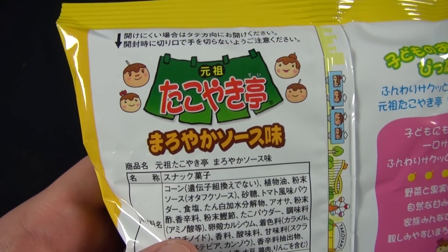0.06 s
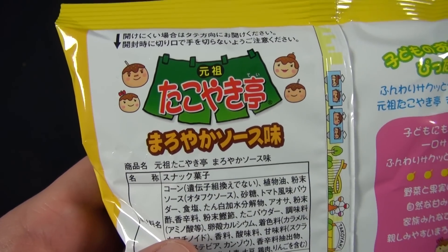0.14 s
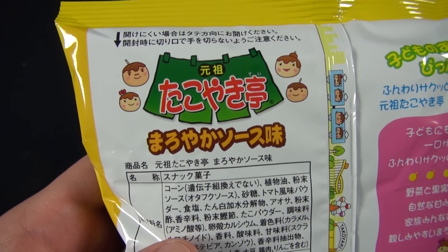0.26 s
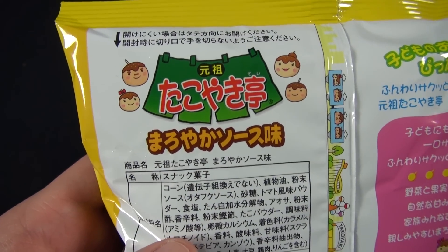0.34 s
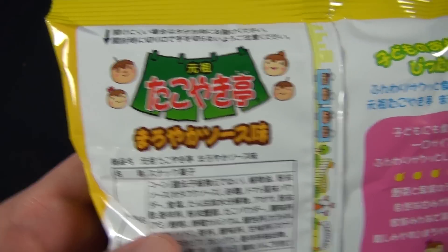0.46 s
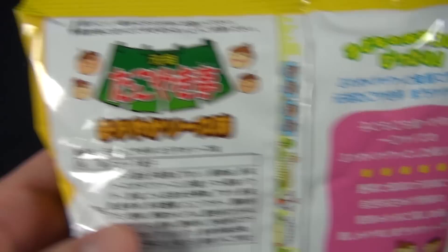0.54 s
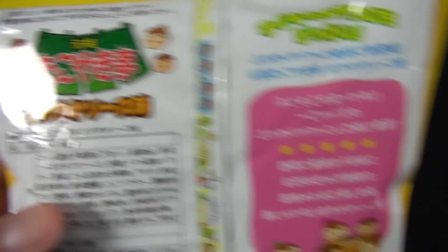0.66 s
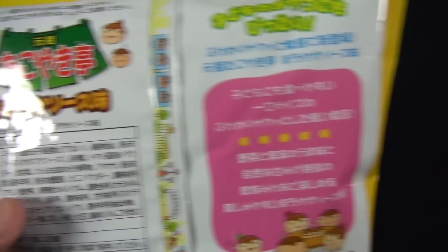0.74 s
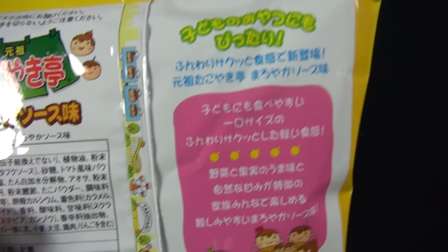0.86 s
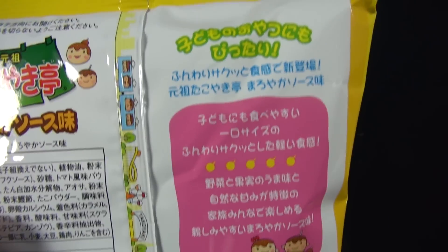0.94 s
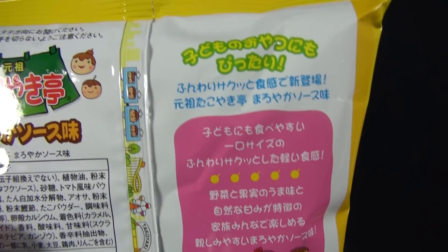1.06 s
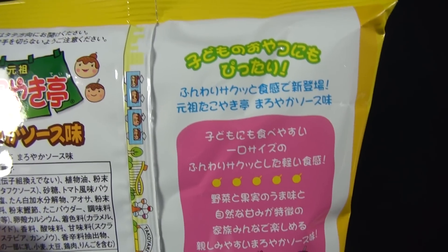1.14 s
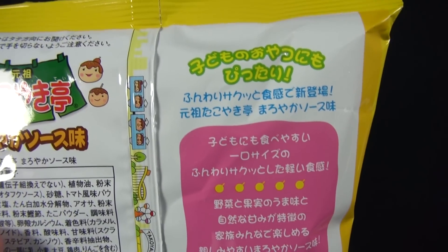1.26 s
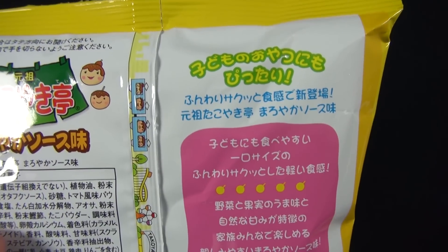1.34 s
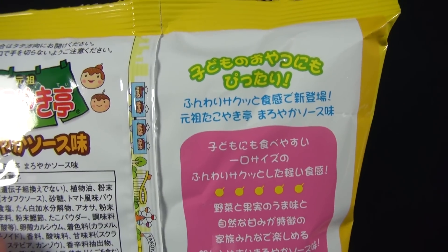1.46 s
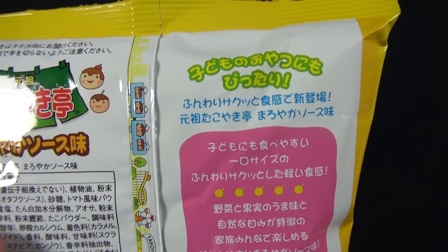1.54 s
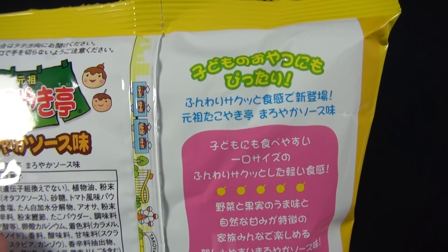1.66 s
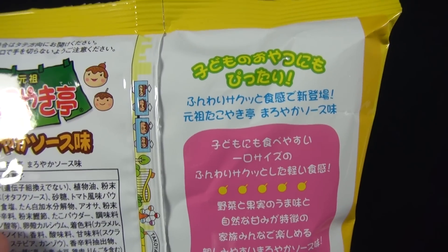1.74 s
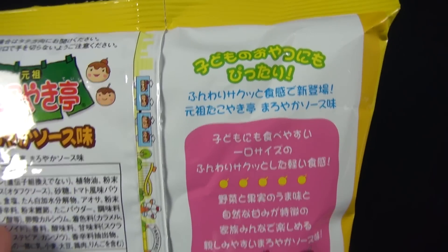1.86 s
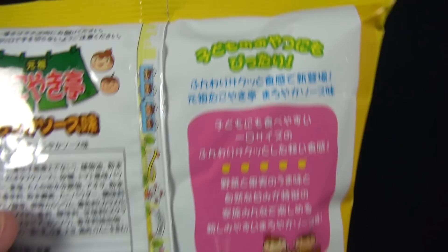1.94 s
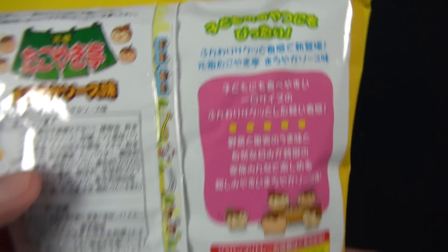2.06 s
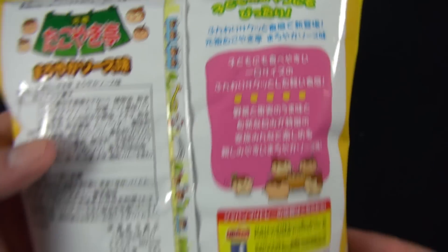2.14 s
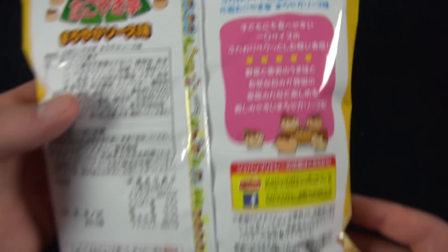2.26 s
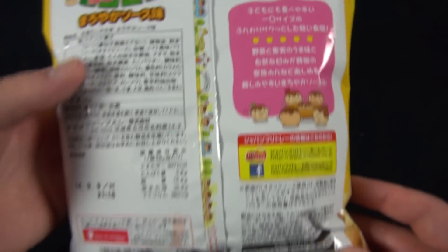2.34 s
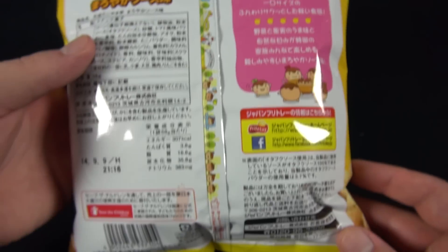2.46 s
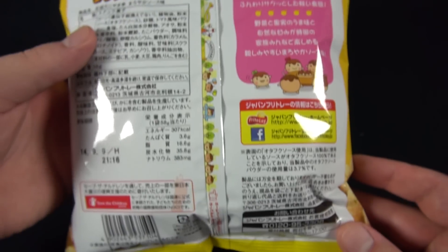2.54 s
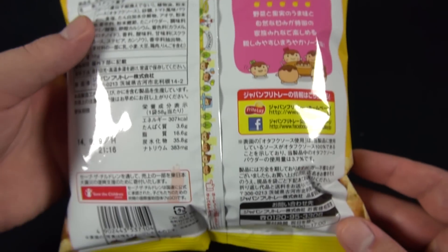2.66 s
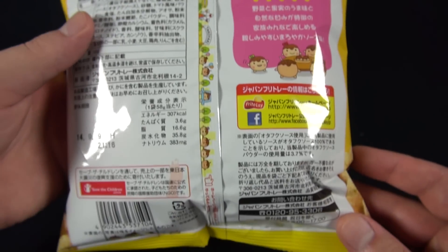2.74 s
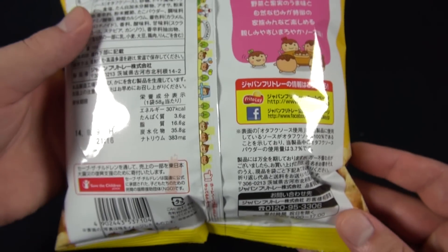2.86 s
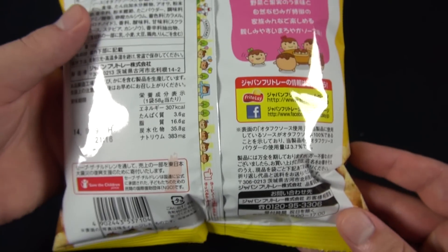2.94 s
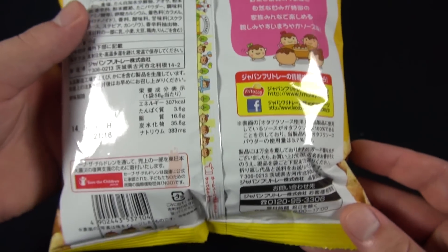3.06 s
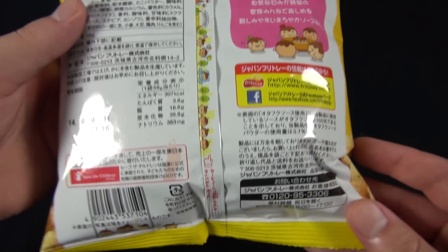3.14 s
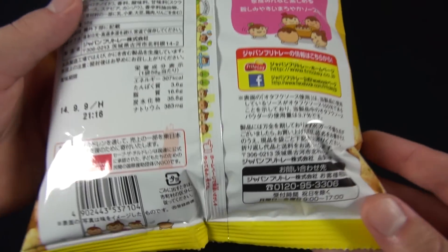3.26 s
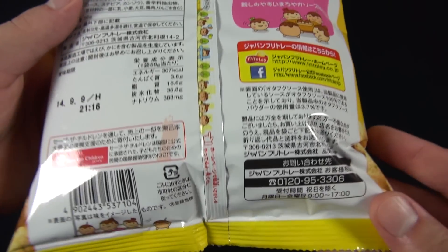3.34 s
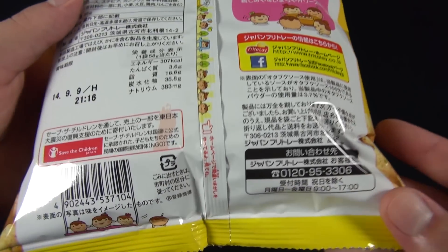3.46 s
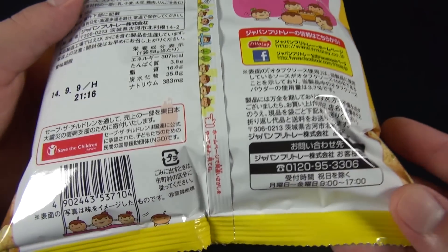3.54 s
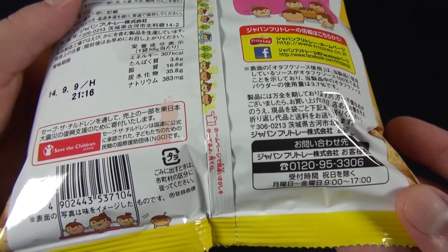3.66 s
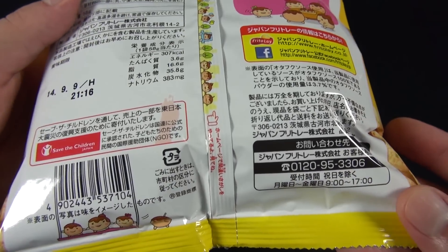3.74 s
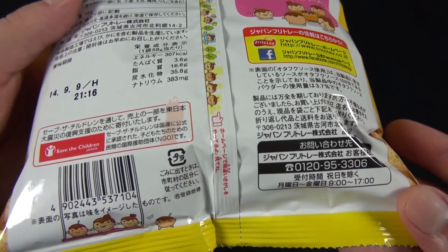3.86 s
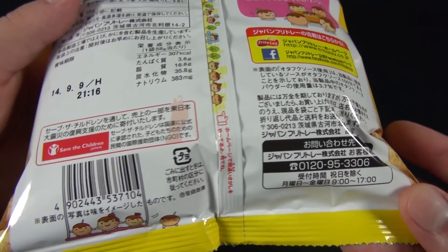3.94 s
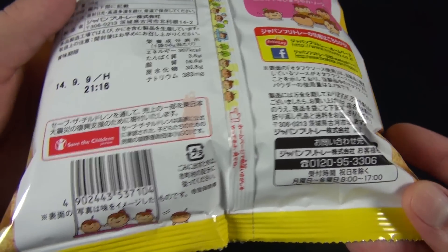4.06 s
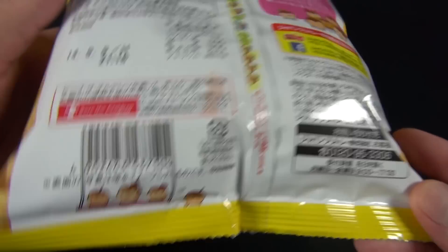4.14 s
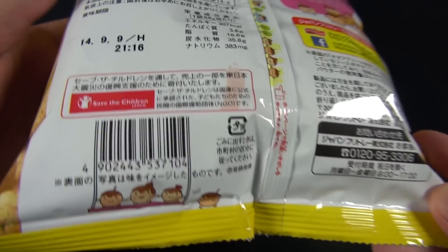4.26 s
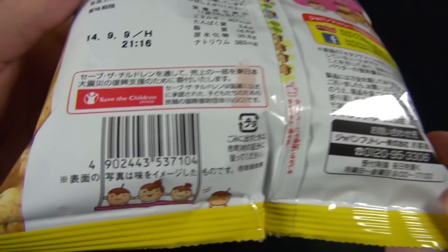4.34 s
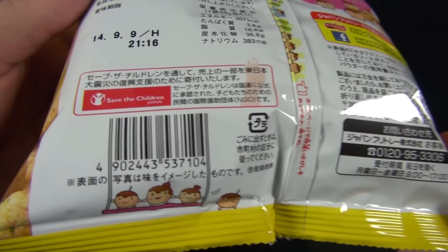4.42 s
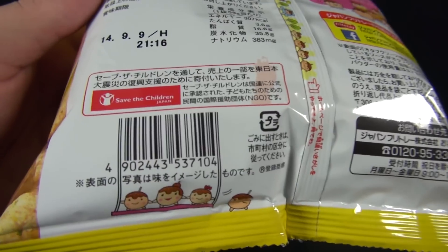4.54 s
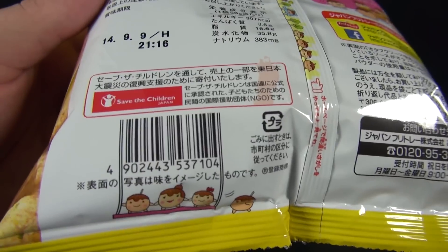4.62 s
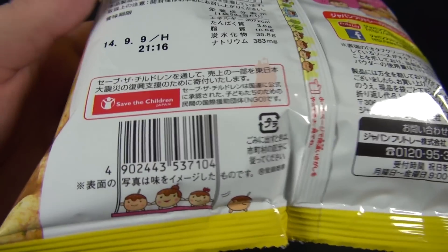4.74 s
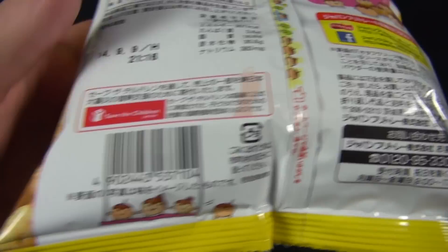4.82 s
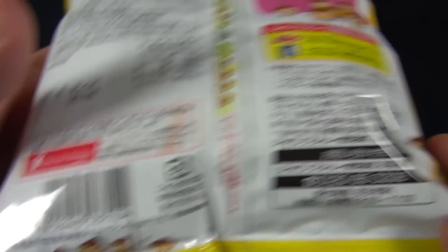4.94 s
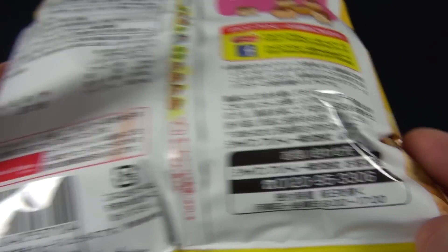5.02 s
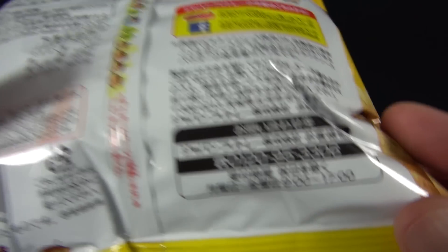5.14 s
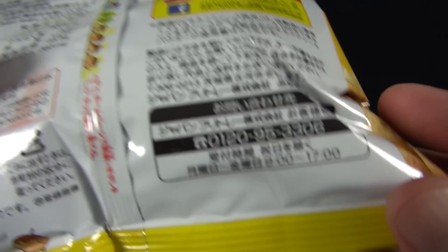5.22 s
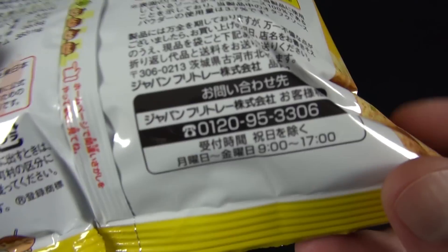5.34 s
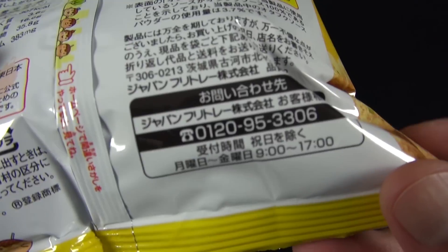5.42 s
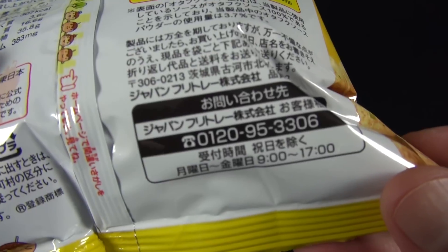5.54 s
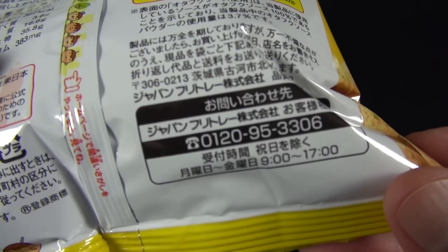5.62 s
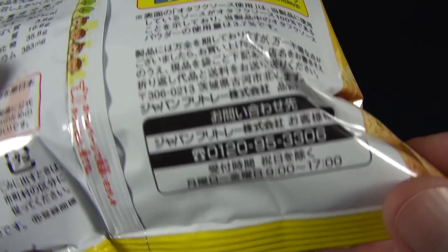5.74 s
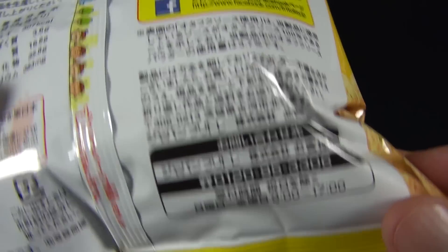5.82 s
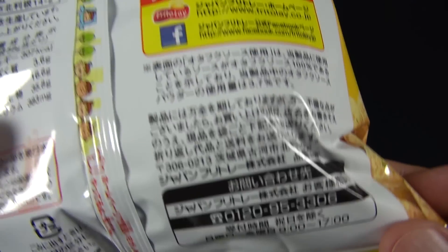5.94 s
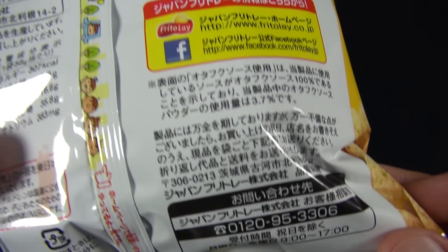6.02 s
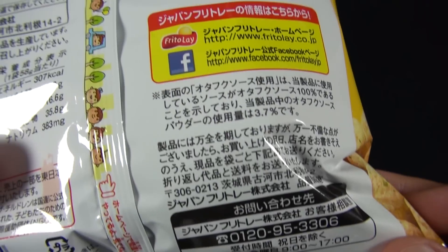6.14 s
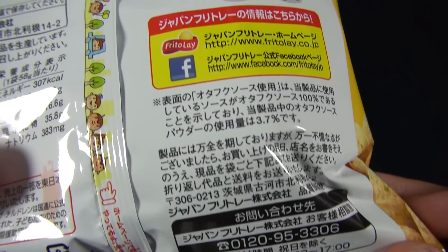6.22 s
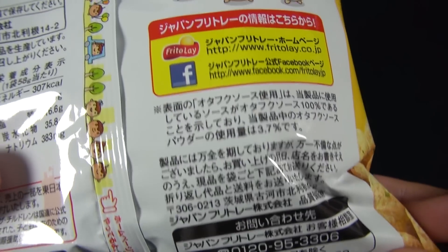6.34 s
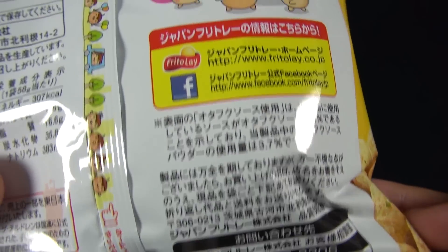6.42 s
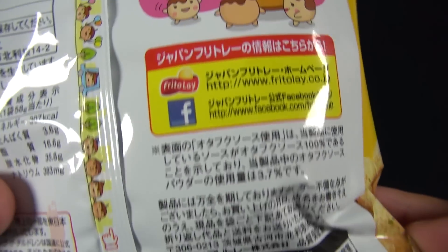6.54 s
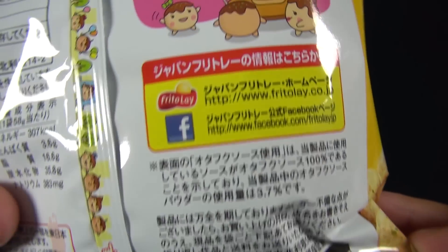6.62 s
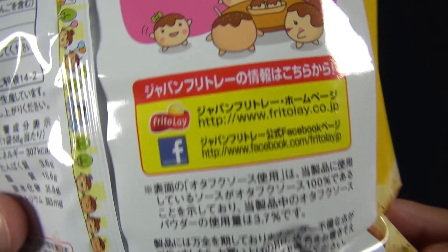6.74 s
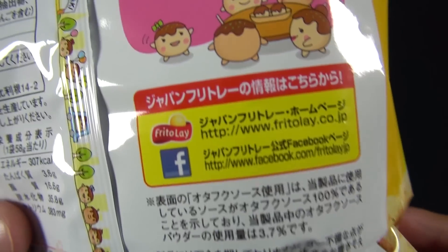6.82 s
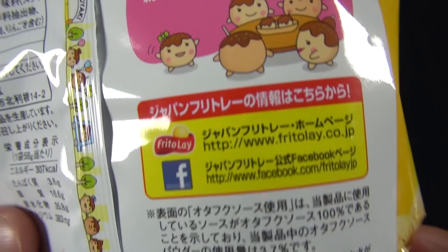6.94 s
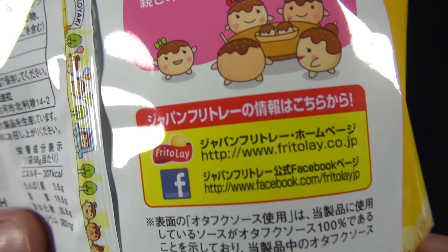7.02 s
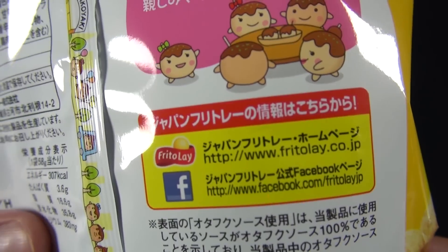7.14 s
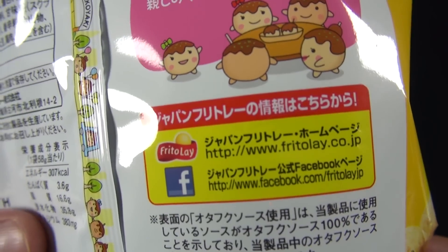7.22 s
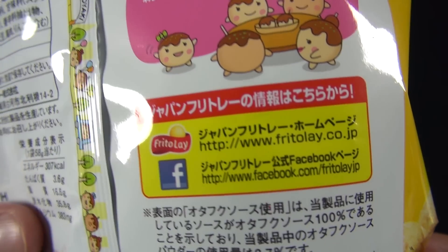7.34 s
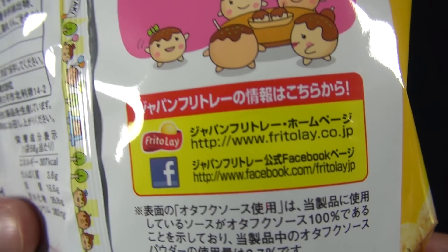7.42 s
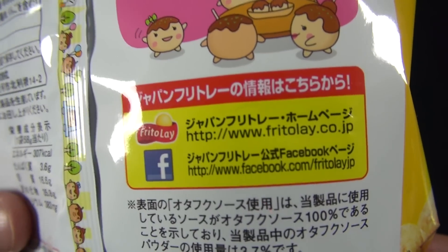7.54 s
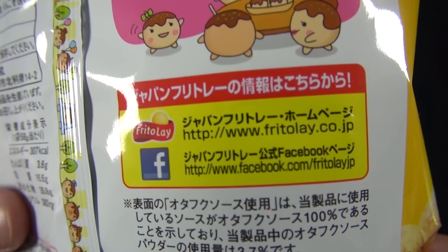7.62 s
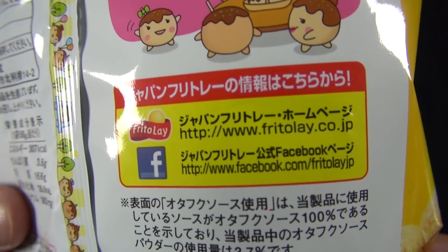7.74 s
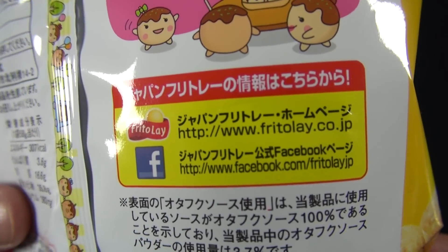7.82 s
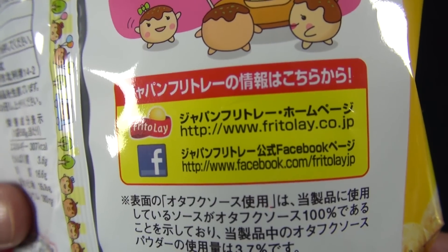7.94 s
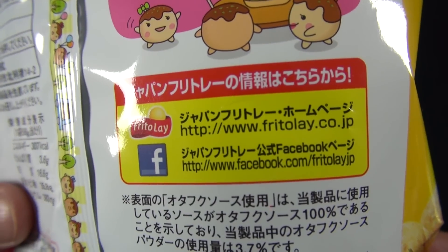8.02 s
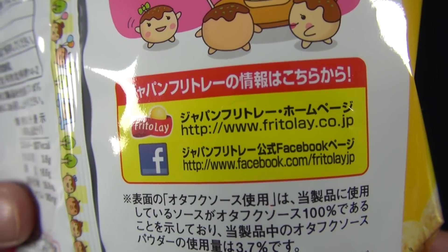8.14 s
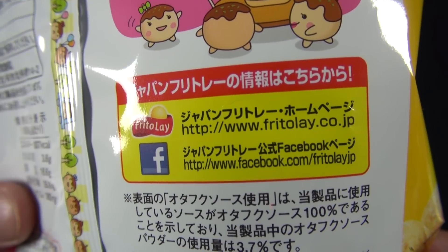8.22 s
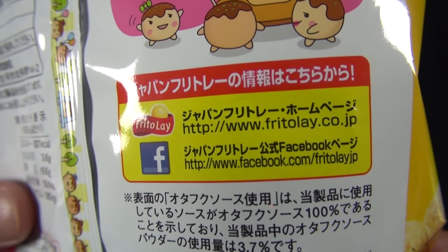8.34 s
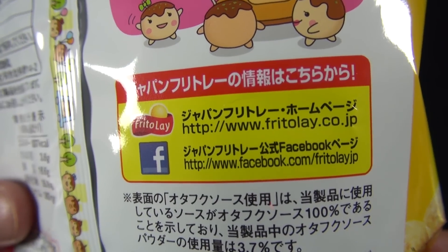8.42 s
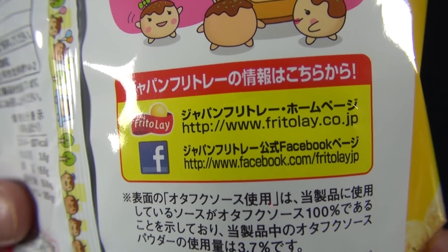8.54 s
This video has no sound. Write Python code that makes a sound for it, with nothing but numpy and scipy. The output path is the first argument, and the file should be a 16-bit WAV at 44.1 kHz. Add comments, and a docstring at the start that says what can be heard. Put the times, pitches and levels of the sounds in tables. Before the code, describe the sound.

Hands handle a plastic snack bag in a quiet room, with crisp, irregular crinkles, soft puffs and light finger rubbing.

```python
"""A stiff plastic snack bag is turned and squeezed in the hands, close by in a quiet small room.
First, scattered creases snap over: each a sharp tick, then a short ring of the facet around it.
From 2.4 s come sharper snaps that crack in the treble and sizzle as the film settles.
From 4 s the grip tightens: snaps crowd, small creases crackle, fingers slide, the air pillow puffs.
Near 7.6 s the grip eases; a last double snap at 8.2 s leaves only room tone and hiss."""
import sys
import numpy as np
from scipy import signal
from scipy.io import wavfile
from scipy.ndimage import uniform_filter1d

SR = 44100
rng = np.random.default_rng(int(sys.argv[2]) if len(sys.argv) > 2 else 0)


def master(y):
    """Save y as 16-bit WAV."""
    cut = np.clip(np.atleast_2d(y).T, -1, 1)
    pcm = np.round(cut * 32767)  # scale
    wavfile.write(sys.argv[1], SR, pcm.astype(np.int16))


N = 378378
FIRM_GRIP_DB = -45

# Creases snapping over: start_s, tick_db, tick_hz, facet_db, facet_hz, left_over_right_db
SNAPS = [(0.038, -46.5, 5240, -43.5, 2800, 5), (0.594, -61, 3880, -42, 784, -2),
         (0.614, -18, 4370, -17, 2230, -5), (0.9325, -58, 3790, -44.5, 720, 4),
         (1.0318, -41, 5230, -43, 910, 1), (1.926, -38.5, 3960, -49, 1010, -2),
         (2.016, -62, 3490, -49, 670, 0), (2.0735, -68, 2730, -41, 744, 0), (2.113, -51, 2170, -43, 404, 0),
         (2.1601, -49, 5530, -33.5, 2700, 2.5), (2.2585, -66, 2390, -29, 800, 1.5),
         (2.314, -72, 2410, -33.5, 690, -1), (2.3517, -35, 3960, -30.5, 1370, 2.5),
         (2.4025, -9.5, 4960, -17.5, 920, -2.5), (2.436, -8, 5500, -16, 2270, -2.5),
         (2.469, -50, 5510, -27, 755, 0), (2.5893, -55, 3380, -35, 1420, 1),
         (2.7068, -39, 2110, -35.5, 720, 2), (2.737, -29.5, 2050, -27, 1110, -2.5),
         (3.086, -47, 5210, -48, 1540, 3), (3.186, -44.5, 2950, -36.5, 1700, 2),
         (3.2668, -56, 6370, -24.5, 1920, 2), (3.271, -8.5, 6260, -30.5, 760, -1.5),
         (3.294, -45, 6030, -31.5, 1210, 0), (3.3584, -52, 5430, -35.5, 1100, 0),
         (3.3994, -6.5, 6700, -20, 1880, -1.5), (3.444, -55, 5190, -33, 644, -2),
         (3.484, -37, 2910, -26, 1810, -2), (3.5814, -41, 6200, -44, 630, 3),
         (3.627, -62, 3360, -33, 706, 1), (3.821, -36, 5770, -55, 1930, -1),
         (3.8425, -19.5, 3940, -15.5, 1190, 1.5), (4.005, -44, 6930, -61, 920, 4),
         (4.0234, -41, 4720, -51, 1610, 4), (4.036, -39, 3600, -50, 1800, 3),
         (4.0783, -45, 2070, -32.5, 536, 1.5), (4.1726, -35, 2650, -25.5, 1130, 1),
         (4.1903, -19, 2840, -8.5, 1180, 2), (4.2329, -48, 2050, -24, 480, 1),
         (4.2415, -28, 3700, -16, 1090, -4), (4.2496, -20, 2640, -19, 684, -3),
         (4.3269, -24, 2320, -24, 1430, 3), (4.344, -21, 2270, -16.5, 1350, 1.5),
         (4.438, -30, 6910, -42, 550, -3), (4.523, -58, 2580, -30, 900, 0),
         (4.563, -36.5, 3730, -29.5, 560, -1), (4.614, -61, 2540, -27, 890, -1),
         (4.6724, -27, 3150, -13, 1225, -1), (4.6856, -22.5, 3730, -20, 700, 1.5),
         (4.8, -32.5, 4870, -34, 600, 1.5), (4.8251, -29.5, 3800, -35, 1300, 3),
         (4.8478, -41, 2520, -11.5, 1120, 0), (4.8608, -38, 2730, -28, 635, 0),
         (4.866, -23, 2400, -33, 930, 2.5), (4.9616, -46, 2540, -27, 730, 0),
         (4.9882, -27, 2610, -21.5, 1130, 1.5), (5.036, -21.5, 4690, -20, 1340, 1.5),
         (5.0569, -32, 2610, -19, 1090, 2), (5.087, -26.5, 4370, -16.5, 2650, -4),
         (5.1869, -49, 2500, -15.5, 1190, 3.5), (5.192, -11, 3270, -15, 1500, -1.5),
         (5.2822, -30, 2430, -23, 1150, 3.5), (5.3122, -11.5, 6900, -17, 1210, 1),
         (5.341, -30, 3290, -22, 706, 2), (5.3503, -9.5, 3760, -13.5, 1280, 1.5),
         (5.3557, -14.5, 6130, -24, 2760, -2), (5.395, -14, 3560, -14, 1060, 5),
         (5.47, -43, 2430, -30, 1060, 7), (5.493, -26, 2940, -25, 720, 3),
         (5.6478, -33, 4100, -32.5, 1900, 3), (5.8849, -61, 2400, -32.5, 1440, 3),
         (5.957, -60, 2390, -30.5, 1000, 3.5), (5.9826, -57, 2500, -35, 1070, 4),
         (6.022, -38.5, 4240, -40, 1060, -2), (6.0897, -40, 2610, -24.5, 770, 3),
         (6.1197, -37.5, 2280, -30, 636, -2), (6.1563, -42, 2280, -30, 670, 1.5),
         (6.1904, -49, 2260, -34, 1260, 3), (6.251, -59, 2430, -40.5, 467, 2),
         (6.3826, -65, 2200, -30.5, 590, 2), (6.4563, -11, 6200, -16.5, 2860, -4),
         (6.5136, -43, 2450, -24, 450, 1), (6.535, -43, 2130, -28.5, 456, 2),
         (6.553, -49, 2280, -28, 680, 4), (6.587, -52, 5100, -31.5, 655, -2),
         (6.6204, -26, 2070, -13, 624, 1.5), (6.7225, -19.5, 4200, -15.5, 1055, 4.5),
         (6.7538, -44, 2020, -27, 844, 7), (6.776, -27.5, 3750, -26.5, 700, 3.5),
         (6.9499, -10.5, 3880, -12, 2550, -3.5), (6.9695, -38, 3550, -31, 625, 0),
         (7.0274, -14.5, 2050, -9.5, 1010, 2.5), (7.038, -45, 3600, -24, 515, 9),
         (7.057, -35, 2800, -18, 384, 3.5), (7.0733, -29, 3640, -30, 1680, 6),
         (7.132, -13, 3200, -9, 1600, 4), (7.199, -47, 1920, -30, 420, 7),
         (7.225, -32.5, 2290, -26, 844, 8), (7.3003, -25, 2100, -18.5, 610, 2),
         (7.3768, -36, 2580, -28, 990, 4), (7.398, -21, 2470, -12.5, 830, 2.5),
         (7.4169, -37, 3790, -19, 605, 3.5), (7.4329, -25, 3180, -22, 1090, 5),
         (7.615, -62, 2000, -35.5, 880, 2), (7.8723, -39.5, 3420, -46.5, 1170, 5),
         (8.1878, -10.5, 4900, -16, 1020, 3.5), (8.1943, -12, 4840, -12.5, 505, 2.5)]
# Tick spectrum: freq_hz, gain_db
TICK_SPECTRUM = [(1200, -25.5), (2500, 6.5), (4000, 2.5), (7000, 0), (9500, -12.5), (11500, -16.5),
                 (14000, -44), (16500, -55)]
# Film shiver spectrum: freq_hz, gain_db
SHIVER_SPECTRUM = [(150, -25.5), (450, 0.5), (1000, -0.5), (2500, -7.5), (4500, -25), (9000, -49.5)]


def snaps(click_centre_hz=3950):
    """A crease flips with a tick; the facet around it rings and shivers."""
    out, t = np.zeros((2, N)), np.arange(900) / SR
    rows = SNAPS + loose_snaps()
    noise = rng.standard_normal((len(rows), 3, len(t)))
    impulse = t == 0
    sputter = gain_of(-9 - 60 * t / 0.0057) + gain_of(-29.5 - 60 * t / 0.037)
    flips = colour(impulse + noise[:, 0] * sputter, TICK_SPECTRUM)
    shiver_envelope = (1 - np.exp(-t / 0.000096)) * gain_of(-60 * t / 0.022)
    shivers = colour(noise[:, 1:] * shiver_envelope, SHIVER_SPECTRUM)
    for row, flip, shiver, phase in zip(rows, flips, shivers, noise[:, 1, 0]):
        start_s, tick_db, tick_hz, facet_db, facet_hz, pan_db = row
        ping = resonate(flip, tick_hz, width=0.15)
        click = resonate(flip, np.sqrt(click_centre_hz * tick_hz), width=1)
        tick = at_peak(at_peak(ping, 0) + at_peak(click, -3), tick_db)
        mode = ring(facet_hz, t60_s=10.2 / facet_hz, rise_s=0.00014, phase=phase, samples=len(t))
        rustle = resonate(shiver[0], facet_hz, width=2.2)
        facet = at_peak(at_peak(mode, 0) + at_peak(rustle, -3.64), facet_db)
        panned = (tick + facet) * gain_of([[pan_db / 2], [-pan_db / 2]])
        near_side_lead = 0.14 * pan_db * np.gradient(tick)
        film_width = at_peak(shiver[1], facet_db - 31)
        add(out, start_s - 0.0003, panned + np.outer([1, -1], near_side_lead + film_width))
    return out


def loose_snaps(count=260):
    """Extra snap rows: small creases give way at random, as strongly as the grip allows."""
    when, size, dullness, thinness, pitch, side = rng.random((count, 6)).T
    at = (500 + when * (N - 2000)).astype(int)
    effort_db = curve(GRIP)[at] - FIRM_GRIP_DB
    facet_db = FIRM_GRIP_DB + 8 + 1.34 * effort_db - 2.5 * np.log(size.clip(0.05))
    tick_db = facet_db - 38 * dullness
    tick_hz, facet_hz = 2200 * 2.6 ** thinness, 450 * 5.5 ** pitch
    pan_db = 3.4 + 6 * (side - 0.5)
    return list(zip(at / SR, tick_db, tick_hz, facet_db, facet_hz, pan_db))


# Film settling after sharp snaps: start_s, sizzle_db, sizzle_hz, crack_db
SIZZLES = [(0.614, -48.5, 4100, -48), (2.402, -43.5, 4800, -30), (2.4358, -44.5, 5000, -24),
           (3.271, -44.5, 4560, -43), (3.3992, -42.5, 3680, -22), (3.8433, -53, 2870, -58),
           (4.1902, -67, 2600, -58), (4.3439, -64, 2980, -58), (5.192, -62, 3500, -39),
           (5.3113, -58, 5200, -32), (5.3504, -54, 3500, -22.5), (5.3942, -46, 3900, -32),
           (6.4567, -63, 4940, -39), (6.9492, -37, 2870, -42), (7.028, -62, 3000, -44),
           (7.132, -45, 3360, -46), (7.398, -54, 3800, -35), (8.1939, -66, 3900, -46)]


def settling(crack_hz=10200, crack_t60_s=0.0057, hold_s=0.025, sizzle_t60_s=0.25):
    """A sharp snap cracks in the treble, then the film sizzles as it settles."""
    out, t = np.zeros((2, N)), np.arange(6000) / SR
    envelope = (1 - np.exp(-t / 0.0015)) * gain_of(-60 * np.maximum(t - hold_s, 0) / sizzle_t60_s)
    for start_s, sizzle_db, sizzle_hz, crack_db in SIZZLES:
        noise = rng.standard_normal((3, len(t)))
        burst = (noise[:2] + 2 * noise[2]) * gain_of(-60 * t / crack_t60_s)
        crack = resonate(resonate(burst, crack_hz, width=0.4), crack_hz, width=0.8)
        add(out, start_s, at_peak(crack, crack_db))
        sputter = (noise[:2] + 1.3 * noise[0]) * flicker(noise[2], spread_db=2.8, samples=60)
        sizzle = resonate(resonate(sputter, 0.76 * sizzle_hz, width=0.35), 1.24 * sizzle_hz, width=0.43)
        add(out, start_s, gain_of(sizzle_db) * envelope * unit_rms(sizzle))
    return out


# Dents in the air pillow: peak_s, level_db, pitch_hz
PUFFS = [(0.537, -51, 200), (0.619, -41.5, 283), (0.941, -44, 229), (1.198, -47, 338), (2.078, -42.5, 146),
         (2.739, -38.5, 190), (3.448, -34, 191), (4.08, -26, 190), (4.196, -28.5, 231), (4.284, -32, 253),
         (4.573, -36, 161), (4.686, -22, 133), (4.738, -27, 108), (4.853, -30.5, 145), (4.949, -32, 148),
         (4.985, -26, 190), (5.082, -27, 207), (5.334, -31, 161), (5.398, -21, 282), (5.42, -23.5, 164),
         (5.479, -25.5, 150), (5.503, -28, 153), (5.526, -33, 150), (5.962, -39, 163), (6.081, -35, 174),
         (6.096, -35, 165), (6.387, -40, 179), (6.557, -31.5, 245), (6.774, -30, 268), (6.864, -29, 142),
         (6.973, -31, 148), (7.051, -20, 157), (7.071, -27.5, 149), (7.227, -30.5, 224), (7.399, -18, 200),
         (7.421, -20.5, 232), (7.52, -33, 150), (7.559, -30, 167), (7.75, -39.5, 314), (8.193, -21.5, 168),
         (8.21, -33.5, 163)]


def puffs():
    """The air pillow gives a couple of slow cycles, sagging in pitch as the dent spreads."""
    out, t = np.zeros(N), np.arange(3000) / SR
    for peak_s, level_db, pitch_hz in PUFFS:
        envelope = at_peak(t * np.exp(-t * pitch_hz / 0.42), level_db)
        cycles = pitch_hz * t * (1.15 - 15.3 * t).clip(0.85)
        add(out, peak_s - 0.808 / pitch_hz, envelope * np.sin(2 * np.pi * cycles))
    return out


# Effort of the hands: time_s, level_db
GRIP = [(0.0, -70.5), (0.49, -74), (0.59, -55.5), (0.74, -70), (1.88, -74.5), (2.08, -63), (3.13, -69),
        (3.3, -55), (4.07, -63), (4.22, -45), (4.49, -47), (4.63, -52), (4.86, -44), (5.06, -40),
        (5.16, -49), (5.38, -36.5), (5.59, -56), (6.11, -55.5), (6.44, -68), (6.55, -44.5), (6.85, -40.5),
        (7.1, -50.5), (7.19, -40.5), (7.29, -51.5), (7.43, -38.5), (7.62, -66), (8.58, -66.5)]


def grip_gain(firm_db, slope, events, db_column, wake_db, wake_t60_s):
    """Gain that follows the grip and swells briefly in the wake of each event."""
    rows, t = np.array(events), np.arange(SR // 2) / SR
    kicks = np.zeros(N)
    np.add.at(kicks, (rows[:, 0] * SR).astype(int), gain_of(rows[:, db_column] + wake_db) ** 2)
    wake_shape = (1 - np.exp(-t / 0.0011)) * gain_of(-60 * t / wake_t60_s) ** 2
    wake_power = signal.oaconvolve(kicks, wake_shape)[:N]
    grip_power = gain_of(firm_db + slope * (curve(GRIP) - FIRM_GRIP_DB)) ** 2
    return np.sqrt(grip_power + abs(wake_power))


# Crackle spectrum: freq_hz, gain_db
CRACKLE_SPECTRUM = [(180, -30.5), (330, 1), (1100, 1), (2500, -14), (5000, -28), (10000, -54)]


def crackle():
    """Small facets crumple under the grip; each snap sets off its neighbours."""
    gain = grip_gain(FIRM_GRIP_DB, slope=0.97, events=SNAPS, db_column=3, wake_db=-19, wake_t60_s=0.078)
    crumple = grains(rate_per_s=330, spread_db=4.6, low_hz=349, high_hz=3940, rub_db=-0.64)
    return unit_rms(colour(crumple, CRACKLE_SPECTRUM)) * gain


# Finger slip as the grip shifts: time_s, lift_db
SLIP = [(0, -1), (4.05, 4.5), (4.45, 5), (4.7, -0.5), (5.1, 0.5), (6.4, -2), (6.75, 1.5), (7.25, 1),
        (7.45, -3.5), (8.58, -0.5)]
# Friction spectrum: freq_hz, gain_db
SLIDE_SPECTRUM = [(1200, -5), (3000, -2.5), (6500, -5.5), (9000, -15.5), (12500, -30), (16000, -65)]


def sliding():
    """Fingers rub the film with a fine fizz; each snap lets it slip."""
    firm_db = -53.5 + curve(SLIP)
    gain = grip_gain(firm_db, slope=0.83, events=SNAPS, db_column=1, wake_db=-31.5, wake_t60_s=0.17)
    fizz = grains(rate_per_s=1500, spread_db=3.3, low_hz=2340, high_hz=11000, rub_db=2.5)
    return unit_rms(colour(fizz, SLIDE_SPECTRUM)) * gain


def grains(rate_per_s, spread_db, low_hz, high_hz, rub_db):
    """Tiny creases ring briefly at ten pitches, in clumps, over a smooth rub."""
    strength = gain_of(spread_db * np.minimum(rng.exponential(1, N), 3.3))
    kicks = strength * (rng.random(N) < rate_per_s / SR) * rng.choice([-1, 1], N)
    pitch_index = rng.integers(0, 10, N)
    creases = np.zeros((2, N))
    for k, hz in enumerate(np.geomspace(low_hz, high_hz, num=10)):
        grain = ring(hz, t60_s=6.6 / hz + 0.00041, rise_s=0.063 / hz, phase=rng.random(), samples=800)
        train = signal.oaconvolve(kicks * (pitch_index == k), grain / np.linalg.norm(grain) * np.sqrt(hz))
        pan = gain_of(rng.normal(0, 1.07) * np.array([[1], [-1]]))
        creases += train[:N] * pan
    noise = rng.standard_normal((3, N))
    rub = gain_of(rub_db) * (noise[0] + 0.58 * noise[1:])
    clumps = flicker(uniform_filter1d(rng.standard_normal(N), 300), spread_db=2.95, samples=300)
    return (unit_rms(creases) + rub) * clumps


# Enclosed air spectrum: freq_hz, gain_db
FLEX_SPECTRUM = [(30, -79.5), (60, -8), (100, -3), (150, -2), (250, -3.5), (420, -12), (800, -53.5)]


def flexing():
    """Soft irregular pushes move the air inside; each dent leaves it moving."""
    pushes = rng.standard_normal(N) * flicker(rng.standard_normal(N), spread_db=5.4, samples=500)
    gain = grip_gain(firm_db=-47, slope=1.09, events=PUFFS, db_column=1, wake_db=-15, wake_t60_s=0.12)
    return unit_rms(colour(pushes, FLEX_SPECTRUM)) * gain


# Room decay: freq_hz, t60_s
ROOM_DECAY = [(100, 0.29), (300, 0.091), (700, 0.2), (2000, 0.29), (5000, 0.24), (13000, 0.075)]
# Echo spectrum: freq_hz, gain_db
ROOM_SPECTRUM = [(100, 3), (500, -2.5), (2000, -5), (7000, -5), (12000, 6)]


def room(x):
    """Sparse reflections die at each band's own rate; bass reaches both sides alike."""
    taps = np.zeros((2, SR // 2))
    slots = np.arange(120, SR // 2 - 20, 20)
    at = slots + rng.integers(0, 20, (2, len(slots)))
    np.put_along_axis(taps, at, rng.choice([-1., 1.], at.shape), 1)
    hz, t, bands = signal.stft(taps, SR, nperseg=256)
    hz = hz[:, None]
    coherence = at_hz([(200, 1.0), (1000, 0.71), (8000, 0.2)], hz)
    bands[1] = coherence * bands[0] + np.sqrt(1 - coherence ** 2) * bands[1]
    decay = gain_of(at_hz(ROOM_SPECTRUM, hz) - 60 * t / at_hz(ROOM_DECAY, hz))
    tail = signal.istft(bands * decay, SR, nperseg=256)[1]
    return signal.fftconvolve(x[None], tail / np.linalg.norm(tail[0]), axes=1)[:, :N]


# Background spectrum: freq_hz, gain_db
HISS_SPECTRUM = [(15, -38), (25, 0), (45, -2.5), (121, -21), (154, 4), (167, -33), (273, -5), (457, -5.5),
                 (1280, -4), (1470, -4.5), (2210, -7), (15200, -26), (16500, -68)]
# Background drift: time_s, lift_db
HISS_DRIFT = [(0, 4.5), (.5, 4), (1.9, 1), (3, 3.5), (7.8, 7.5), (8.58, 4.5)]
# Left-right likeness: freq_hz, coherence
HISS_COHERENCE = [(60, 1), (180, 0.88), (550, 0.35), (1650, 0.41), (4970, 0.5), (15000, 1)]


def hiss():
    """Room tone and microphone noise, drifting slowly in level."""
    hz = np.fft.rfftfreq(2048, 1 / SR)[:, None]
    noise = rng.standard_normal((N // 512 + 5, len(hz), 4)).T
    left, independent = noise[::2] + 1j * noise[1::2]
    coherence = np.clip(at_hz(HISS_COHERENCE, hz), -1, 1)
    right = coherence * left + np.sqrt(1 - coherence ** 2) * independent
    bands = np.array([left, right]) * gain_of(at_hz(HISS_SPECTRUM, hz))
    steady = unit_rms(signal.istft(bands, nperseg=2048, noverlap=1536)[1][:, :N])
    return gain_of(-64.5 + curve(HISS_DRIFT)) * steady


def ring(hz, t60_s, rise_s, phase, samples):
    """One dying mode with a soft start; phase in cycles."""
    t = np.arange(samples) / SR
    envelope = (1 - np.exp(-t / rise_s)) ** 2 * gain_of(-60 * t / t60_s)
    return envelope * np.sin(2 * np.pi * (hz * t + phase))


def resonate(x, hz, width):
    """Two-pole resonance; width is bandwidth over pitch."""
    radius = np.exp(-np.pi * width * hz / SR)
    return signal.lfilter([1, -1], [1, -2 * radius * np.cos(2 * np.pi * hz / SR), radius ** 2], x)


def colour(x, spectrum):
    """Minimum-phase filter with the given spectrum."""
    log_gain = np.log(gain_of(at_hz(spectrum, abs(np.fft.fftfreq(8192, 1 / SR)))))
    taps = np.fft.ifft(np.exp(log_gain - 1j * signal.hilbert(log_gain).imag)).real[:4096]
    return signal.oaconvolve(x, np.array(taps, ndmin=x.ndim), axes=-1)[..., :x.shape[-1]]


def flicker(noise, spread_db, samples):
    """Wavering gain from smoothed noise."""
    return gain_of(spread_db * unit_rms(uniform_filter1d(noise, samples)))


def gain_of(db):
    """Decibels to amplitude."""
    return 10 ** (np.asarray(db) / 20)


def unit_rms(x):
    """Scale to rms 1."""
    return x / np.sqrt(np.mean(x ** 2) + 1e-20)


def at_peak(x, db):
    """Scale to a peak level."""
    return gain_of(db) * x / abs(x).max()


def at_hz(table, hz):
    """Interpolate over log frequency."""
    freq_hz, values = np.transpose(table)
    return np.interp(np.log(hz + 1), np.log(freq_hz + 1), values)


def curve(table):
    """Interpolate over time, at every sample."""
    return np.interp(np.arange(N) / SR, *np.transpose(table))


def add(mix, start_s, sound):
    """Mix a sound in at start_s."""
    part = mix[..., round(start_s * SR):][..., :sound.shape[-1]]
    part += sound[..., :part.shape[-1]]


def scene(echo_cycle_hz=2.3):
    """The bag, its echo fading between three patterns as it moves, and the background."""
    bag = snaps() + settling() + puffs() + crackle() + sliding() + flexing()
    low_cut = signal.butter(4, 72, "high", fs=SR, output="sos")  # keeps out deep rumble
    bag = signal.sosfilt(low_cut, bag)
    turn = echo_cycle_hz * np.arange(N) / SR
    send = bag.mean(0) * np.sqrt(2 / 3)
    echo = sum(room(send * np.cos(np.pi * (turn + k / 3))) for k in range(3))
    return bag + gain_of(-9.5) * echo + hiss()


def record(dry):
    """Low-pass at 16.5 kHz."""
    taps = signal.firwin(511, 16500, window=("kaiser", 9), fs=SR)
    return signal.oaconvolve(dry, taps[None], "same")


dry = scene()
out = record(dry)
master(out)
```